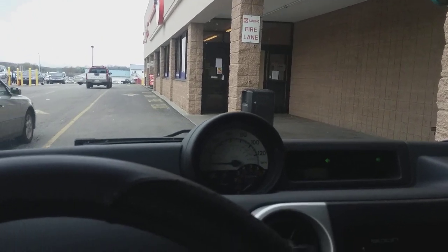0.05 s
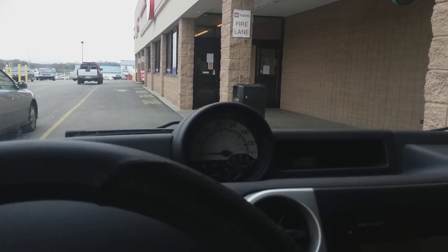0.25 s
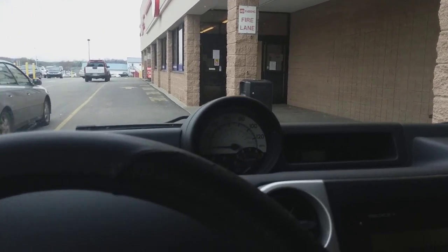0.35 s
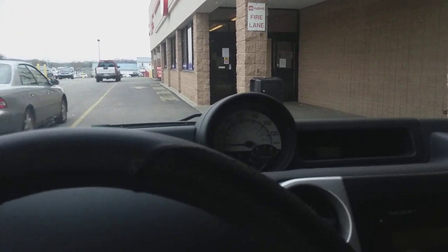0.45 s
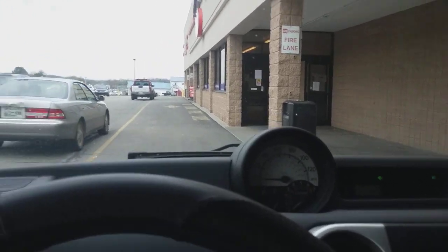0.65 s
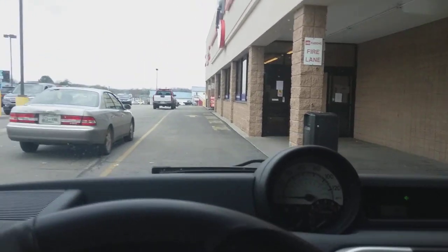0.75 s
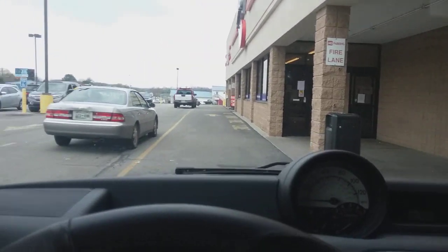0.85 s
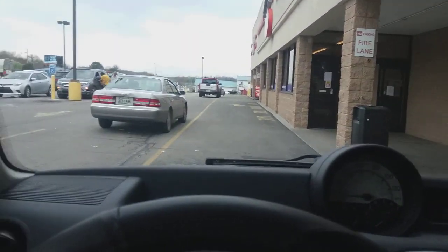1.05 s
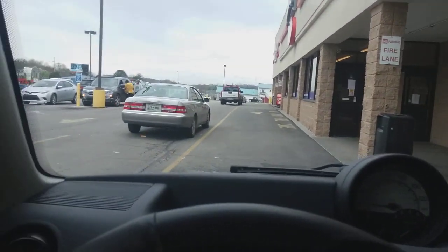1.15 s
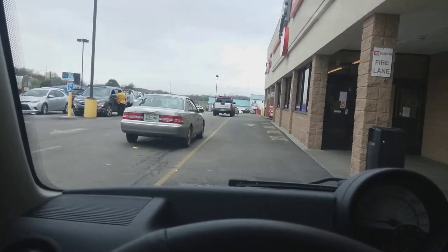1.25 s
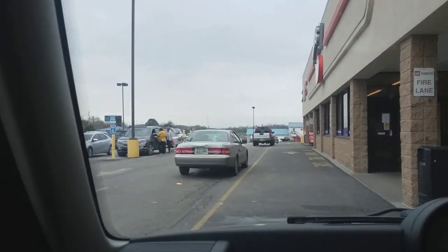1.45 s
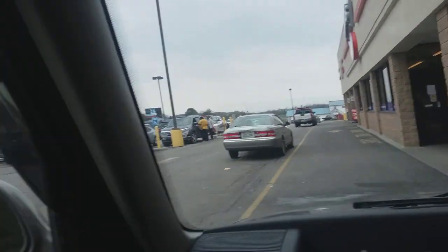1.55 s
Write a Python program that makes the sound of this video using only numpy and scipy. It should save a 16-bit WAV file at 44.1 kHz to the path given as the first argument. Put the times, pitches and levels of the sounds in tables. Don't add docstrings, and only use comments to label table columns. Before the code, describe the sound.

Two hard lever clunks inside a parked car, then quiet, steady hazard-relay ticking and a seat creak

```python
import sys
import numpy as np
from scipy import signal
from scipy.fft import rfft, irfft
from scipy.io import wavfile
from scipy.ndimage import uniform_filter1d

SR = 44100
rng = np.random.default_rng(int(sys.argv[2]) if len(sys.argv) > 2 else 0)


def undo_db(level):
    steps = np.asarray(level, float) / 20
    return 10 ** steps


def dump_mix(stems):
    frames = np.atleast_2d(stems).T
    limited = np.clip(frames, -1, 1)
    pcm = np.round(limited * 32767).astype(np.int16)
    wavfile.write(sys.argv[1], SR, pcm)


N = 70560

# (time [s], level [dB])
ENGINE_FADE = [
    (0.0, -44.5),
    (0.106, -66),
    (0.12, -67),
]
# (frequency [Hz], density [dB per Hz])
ENGINE_TONE = [(15, -11), (25, -0.5), (110, -6), (233, -13), (494, -21), (647, -15.5), (900, -29.5),
               (1170, -38), (1980, -120)]

# (start [s], peak [s], end [s], level [dB], centre [Hz])
CLOTH_BRUSHES = [
    (.0, 0.061, 0.081, -51.5, 1204),
    (.0, 0.046, 0.094, -62, 3950),
    (0.445, 0.462, .52, -60.5, 2400),
    (1.121, 1.22, 1.266, -61, 4630),
    (1.464, 1.478, 1.52, -53, 4590),
    (1.443, 1.476, 1.53, -50, 1200),
]
CLOTH_WIDTHS = [1.13, 0.51, 0.77, 0.73, 0.37, 2.5]

# (frequency [Hz], density [dB per Hz])
STREET_TONE = [(30, -20), (55, -1.5), (120, 3.5), (200, -5), (320, -25.5), (1000, -21), (1600, -7.5),
               (1850, -12.5), (2600, -19.5), (4800, -24.5), (6000, -46)]
# (time [s], level [dB])
STREET_SWELL = [(0, 12), (.3, 3.5), (.55, 6.5), (.85, 8), (1.2, 13), (1.34, -6.5), (1.43, 3.5), (1.6, 9.5)]
STREET_EDGES = [20, 220, 500, 1500, 3500, 9000]
# (frequency [Hz], density [dB])
HISS_TONE = [(1000, 14.5), (5000, 1), (15600, -1.5), (16000, -28.0)]

# (time [s], peak [dB], ring [Hz], t60 [s], pan [dB])
TAPS = [(0.126, -41.5, 1061, 0.041, 2), (0.132, -47.5, 1790, 0.026, 3), (0.171, -48, 2390, 0.057, 0),
        (.2955, -38, 3980, 0.0088, -1), (0.4, -46, 1214, 0.039, 5), (0.401, -52.5, 3870, 0.027, 2),
        (0.456, -54.5, 2540, 0.086, 2), (0.65, -55, 1025, 0.0412, 4), (.980, -52.5, 710, 0.1, 5),
        (1.019, -51, 750, 0.044, -5), (1.057, -48, 2336, 0.02, 7), (1.058, -52.5, 4640, 0.02, 5),
        (1.081, -44, 850, .02, -1), (1.192, -54, 1180, 0.023, -3), (1.306, -51, 1448, 0.042, 1),
        (1.3056, -57.5, 3050, 0.02, 3.5), (1.3062, -57.5, 682, 0.015, 5), (1.352, -81, 1410, 0.0084, -3),
        (1.495, -42.5, 4720, 0.014, 20), (1.4965, -45.5, 1640, 0.0078, 17)]

# (frequency [Hz], level [dB], t60 [s])
DETENT_A_MODES = [(1028, -6, 0.059), (1414, -4, 0.042), (1638, -5.5, 0.045), (1800, -16.5, 0.027),
                  (2026, 0.5, 0.044), (2800, -17, .04), (3145, -1, 0.053), (3503, -4.5, 0.14),
                  (3643, 1, 0.063), (4220, -1.5, 0.042), (4280, -10, 0.044), (5590, -4.5, .04),
                  (5980, -3.5, 0.041), (7610, -1.5, 0.027)]
DETENT_B_MODES = [(1021, -13, .08), (1430, 0, 0.035), (1600, 0, 0.067), (1805, -4.5, 0.07),
                  (2210, -14, 0.03), (2611, 1.5, .07), (2798, -7, 0.062), (3000, -6.5, 0.068),
                  (3666, -10, .05), (4285, -8.5, 0.058), (4544, -11, 0.02), (5003, -9, .06),
                  (5410, -4, 0.0413), (7530, -7, 0.03)]
# (frequency [Hz], density [dB per Hz])
DETENT_A_CRACK = [(300, -24), (1000, -17.5), (1500, -1.5), (2500, -12.5), (3600, -2), (4700, -13.5),
                  (6000, -8.5), (7600, -9.5), (8300, -17), (16000, -26)]
DETENT_B_CRACK = [(300, -21.5), (900, -17.5), (1500, -9), (2700, -8.5), (5500, -14.5), (8000, -24),
                  (10000, -29), (16000, -31.5)]
# (time [s], peak [dB], rise [s], crack share [dB], pan [dB])
LEVER_STROKES = [
    (0.194, -35.5, 0.00088, 1, 13),
    (0.2, -14, 0.00089, 3, 2.5),
    (0.2989, -7, 0.00077, 3, 2.5),
]
# (frequency [Hz], level [dB], swell time [s])
BOOM_MODES = [(109, -10, 0.031), (189.3, -12, 0.014), (255.8, -9.5, 0.024), (307, -3.5, 0.022),
              (390.6, -5, 0.014), (610.5, 2, 0.0089), (752, -13, 0.014), (983, -5.5, 0.017)]
# (time [s], peak [dB], time scale [ratio])
BOOM_HITS = [
    (0.2, -42.5, 0.93),
    (.301, -22.5, 1.0),
]

# (frequency [Hz], level [dB], t60 [s])
TOCK_MODES = [(1750, -10, .05), (2350, -3, .055), (2930, 0, .06), (4400, -10, .045)]
TICK_MODES = [(778, -18, 0.045), (1414, -7.5, 0.048), (1873, -9, 0.06), (2483, -1.5, 0.052),
              (2633, -6, 0.029), (3206, -8.5, 0.044), (4346, -1, 0.038), (5000, -5.5, 0.028),
              (6330, -11.5, 0.035)]
# (frequency [Hz], density [dB per Hz])
TOCK_CRACK = [(300, -13.5), (1000, -14), (1700, -0.5), (3000, -1.5), (4500, -15), (16000, -37)]
TICK_CRACK = [(300, -25), (1000, -38), (1500, -6.5), (2600, -7), (3800, -5), (4700, -15), (5300, -13.5),
              (6500, -17), (7200, -23), (16000, -27)]
# (time [s], peak [dB], rise [s], crack share [dB], pan [dB])
RELAY_STROKES = [
    (.282, -34.5, 0.001, 10.5, 3.5),
    (.660, -39.5, 0.0011, -0.5, 4.5),
    (.990, -34.5, 0.00095, 3.5, 2),
    (1.367, -39, 0.0014, -6.5, 2.5),
]

# (time [s], level [dB])
CREAK_LEVEL = [(.975, -52.5), (.995, -46), (1.015, -84), (1.022, -56), (1.04, -48.5), (1.05, -67),
               (1.055, -50), (1.09, -47.5), (1.13, -50.5), (1.18, -54), (1.2, -50.5), (1.215, -66.5),
               (1.235, -58), (1.27, -83)]
# (frequency [Hz], width [Hz], level [dB])
SEAT_MODES = [(108, 22, -11), (200, 90, -4), (310, 140, -3), (495, 55, -1), (860, 220, -2), (1400, 700, -1)]

# (time [s], peak [dB], ring [Hz], width [s], spike [dB])
KNOCKS = [
    (1.4695, -46, 4300, .0004, -6),
    (1.4744, -28, 820, .0011, -1),
    (1.4748, -37, 1750, .001, -12),
    (1.4749, -37, 4800, .0005, 2),
    (1.4788, -41, 4000, .0005, -6),
    (1.4807, -31, 5600, .0003, 6),
    (1.4845, -37, 520, .0011, -9),
    (1.4855, -42, 170, .0035, -30),
]
# (frequency [Hz], level [dB])
SPIKE_TONE = [(900, -16), (1700, 0), (5000, -2), (8500, -6), (16500, -5)]
# (time [s], peak [dB], half length [s])
SQUEAK_THROBS = [(1.487, -57, .0025), (1.497, -57, .0025), (1.503, -57, .002), (1.517, -55, .003),
                 (1.525, -59, .002), (1.537, -54, .0028), (1.545, -54, .0022), (1.5595, -47.5, .0024),
                 (1.571, -54, .003), (1.587, -57, .002), (1.596, -60, .003)]


def colour(x, spec):
    points = np.array(spec)
    hz = np.arange(x.shape[-1] // 2 + 1) * SR / x.shape[-1] + 1
    gain = undo_db(np.interp(np.log(hz), np.log(points[:, 0]), points[:, 1]))
    return irfft(rfft(x) * gain, x.shape[-1])


def band(x, hz, width):
    return signal.lfilter(*signal.iirpeak(hz, hz / width, fs=SR), x)


def pair(size, alike_hz=700):
    mid, side = rng.standard_normal((2, size))
    side = signal.lfilter(*signal.butter(1, alike_hz, "high", fs=SR), side)
    return np.array([mid + side, mid - side])


def unit(x):
    return x / np.sqrt(np.mean(x ** 2))


def walk(rate):
    k = int(SR / rate)
    steps = np.repeat(rng.standard_normal(N // k + 1), k)
    return unit(uniform_filter1d(uniform_filter1d(steps, k), k)[:N])


def curve(rows):
    r = np.array(rows)
    return undo_db(np.interp(np.arange(N) / SR, r[:, 0], r[:, 1], left=-120, right=-120))


def add(out, at, db, sound, pan_db=0):
    i = int(at * SR)
    panned = sound * undo_db(np.array([[pan_db], [-pan_db]]) / 2)
    panned = panned[:, :N - i] * undo_db(db) / np.abs(sound_mid_peak(panned[:, :N - i]))
    out[:, i:i + panned.shape[1]] += panned


def sound_mid_peak(sound):
    return np.abs(sound.mean(0)).max()


def hit(modes, rise, crack, crack_db, tail_s):
    cluster = .025
    padded_s = .043
    t = np.arange(SR // 6) / SR
    f, db, t60 = np.repeat(modes, 3, axis=0).T[:, :, None]
    start, lead, off = rng.uniform(-np.pi, np.pi, (3, len(f), 1))
    t60 = np.minimum(t60, .068)
    side = np.arange(len(f))[:, None] % 3 > 0
    db, off = db - 7 * side, off * side
    lead = lead * np.minimum(f / 1200, 1) / 2
    f = f * (1 + cluster * off / np.pi)
    decay = undo_db(db - 60 * t / t60)
    ring = np.array([(decay * np.sin(2 * np.pi * f * t + start + s * lead)).sum(0) for s in (1, -1)])

    noise = unit(colour(pair(len(t)), crack))
    low = signal.lfilter(*signal.butter(1, 6000, fs=SR), noise)
    low_fade = undo_db(-60 * t / tail_s) + undo_db(-19.5 - 60 * t / (2.16 * tail_s))
    high_fade = undo_db(-60 * t / (0.66 * tail_s) + np.array([[-3.], [3.]]))
    noise = low * low_fade + (noise - low) * high_fade

    both = ring / np.abs(ring).max() + undo_db(crack_db) * noise / 3
    both = both * (1 - np.exp(-t / rise)) ** 2 / (1 + (t / padded_s) ** 20)
    return signal.lfilter(*signal.butter(2, 300, "high", fs=SR), both)


def engine():
    return unit(colour(pair(N), ENGINE_TONE)) * curve(ENGINE_FADE) * undo_db(0.5)


def cloth():
    t, x = np.arange(N) / SR, 0
    for (start, top, end, db, hz), share in zip(CLOTH_BRUSHES, CLOTH_WIDTHS):
        shape = np.interp(t, [start, top, end], [0, 1, 0]) ** 1.1
        grain = undo_db(db + 0.48 * walk(91.6))
        x = x + grain * shape * unit(band(band(pair(N), hz, hz * share), hz, hz * share))
    return x


def street():
    level_db, rumble_db, pan_db, hiss_db = -65, 1, 1.5, -73
    noise = unit(colour(pair(N, alike_hz=400), STREET_TONE))
    bands = []
    for edges in zip(STREET_EDGES, STREET_EDGES[1:]):
        sos = signal.butter(2, edges, "band", fs=SR, output="sos")
        bands.append(undo_db(1.3 * walk(7)) * signal.sosfilt(sos, noise))
    x = undo_db(rumble_db) * bands[0] + curve(STREET_SWELL) * sum(bands[1:])
    x = x * undo_db(level_db + pan_db * np.array([[.5], [-.5]]))
    return x + undo_db(hiss_db) * colour(pair(N), HISS_TONE)


def taps():
    x = np.zeros((2, N))
    for at, db, hz, t60, pan_db in TAPS:
        crack = [(hz / 4, -12), (hz, 0), (hz * 1.9, -5), (hz * 2.8, -15), (hz * 10, -34)]
        modes = [(hz, 0, t60), (hz * 1.15, -6, t60)]
        add(x, at, db, hit(modes, .0008, crack, crack_db=3.5, tail_s=t60), pan_db)
    return x


def lever():
    x = np.zeros((2, N))
    modes = (DETENT_A_MODES, DETENT_A_MODES, DETENT_B_MODES)
    cracks = (DETENT_A_CRACK, DETENT_A_CRACK, DETENT_B_CRACK)
    for (at, db, rise, crack_db, pan_db), m, c in zip(LEVER_STROKES, modes, cracks):
        add(x, at, db, hit(m, rise, c, crack_db, tail_s=0.05), pan_db)
    for at, db, scale in BOOM_HITS:
        add(x, at, db, boom(scale))
    return x


def boom(scale):
    t = np.arange(SR // 8) / SR / scale
    f, db, top = np.array(BOOM_MODES).T[:, :, None]
    start = rng.uniform(0, 2 * np.pi, (len(BOOM_MODES), 1))
    level = undo_db(db - 34 * (1 - scale) * (f < 200))
    spread_s = np.where(t < top, 0.36 * top, .009)
    swell = level * np.exp(-.5 * ((t - top) / spread_s) ** 2)
    leads = (0.0011, -0.00059)
    return np.array([(swell * np.sin(2 * np.pi * f * t * scale + start + lead * f)).sum(0) for lead in leads])


def relay():
    x = np.zeros((2, N))
    sides = ((TOCK_MODES, TOCK_CRACK), (TICK_MODES, TICK_CRACK))
    for k, (at, db, rise, crack_db, pan_db) in enumerate(RELAY_STROKES):
        modes, crack = sides[k % 2]
        add(x, at, db, hit(modes, rise, crack, crack_db, tail_s=0.065), pan_db)
    return x


def creak():
    rate_hz, jitter, scatter_db = 150, .45, 2
    chance = rng.standard_normal((N // 100, 2)).T
    at = (np.cumsum(np.exp(jitter * chance[0])) * SR / rate_hz).astype(int)
    pulses = np.zeros(N)
    pulses[at[at < N]] = undo_db(scatter_db * chance[1][at < N])
    slip = signal.lfilter([1], [1, -np.exp(-1 / (0.018 * SR))], pulses)
    drive = unit(uniform_filter1d(pulses, size=14)) + 1.6 * unit(slip * rng.standard_normal(N))
    drive = signal.lfilter(*signal.butter(2, 2400, fs=SR), drive) * curve(CREAK_LEVEL)
    body = [(-1) ** k * undo_db(db) * band(drive, f, w) * np.sqrt(SR / w) for k, (f, w, db) in enumerate(SEAT_MODES)]
    right = sum(body[:3]) + undo_db(-2.5) * np.roll(sum(body[3:]), 9)
    return undo_db(-23) * np.array([sum(body), right])


def hand_knocks():
    x = np.zeros((2, N))
    for at, db, hz, width_s, spike_db in KNOCKS:
        add(x, at - 220 / SR, db, knock(hz, width_s, spike_db), pan_db=14)
    return x


def knock(hz, width_s, spike_db):
    t = np.arange(-220, 600) / SR
    spike = colour(1. * (t == 0), SPIKE_TONE)
    thump = np.cos(2 * np.pi * hz * t) * np.exp(-.5 * (t / width_s) ** 2)
    return thump + undo_db(spike_db) * spike / spike.max() * np.ones((2, 1))


def squeak():
    pitch_hz, rise_hz_s = 1700, 900
    t = np.arange(N) / SR
    throb = sum(undo_db(db) * np.exp(-.5 * ((t - at) / half) ** 2) for at, db, half in SQUEAK_THROBS)
    hz = pitch_hz + rise_hz_s * np.clip(t - SQUEAK_THROBS[0][0], 0, .08)
    hz = hz * (1 + .006 * walk(70))
    tone = np.sin(np.cumsum(2 * np.pi * hz / SR))
    rasp = .4 * unit(band(band(pair(N), pitch_hz, 300.), pitch_hz, 300.))
    return throb * (np.array([[.5], [1.5]]) * tone + rasp)


def scene():
    return (engine() + cloth() + street() + taps() + lever() + relay()
            + creak() + hand_knocks() + squeak())


def roll_off(x):
    return signal.sosfilt(signal.butter(12, 16820, fs=SR, output="sos"), x)


def record(dry):
    round_at, top_hz = .75, 16350
    rounded = round_at * np.tanh(dry / round_at)
    mix = signal.sosfilt(signal.ellip(8, .2, 70, top_hz, fs=SR, output="sos"), rounded)
    return roll_off(mix)


dry = scene()
out = record(dry)
dump_mix(out)
```